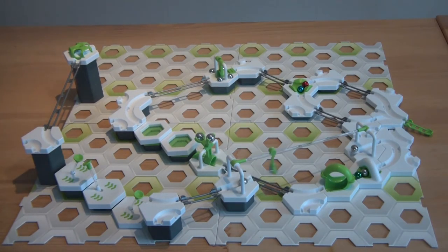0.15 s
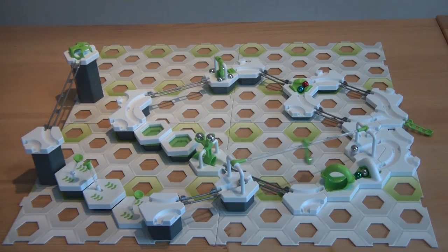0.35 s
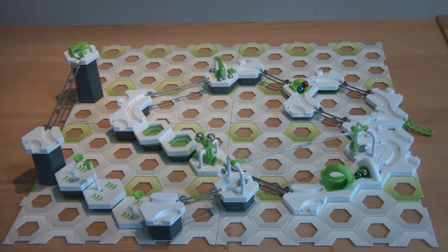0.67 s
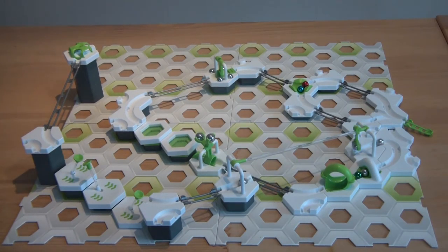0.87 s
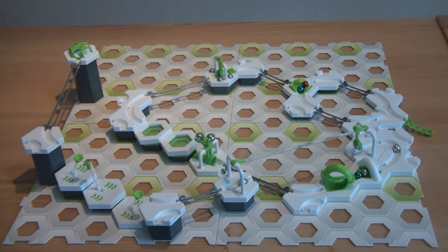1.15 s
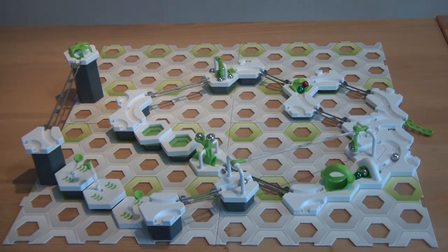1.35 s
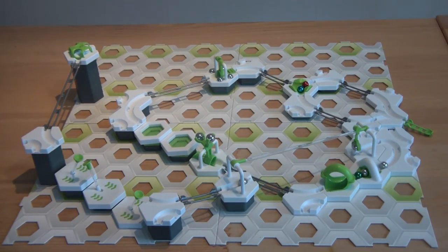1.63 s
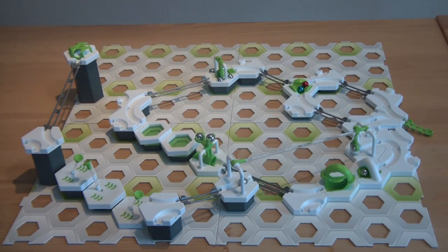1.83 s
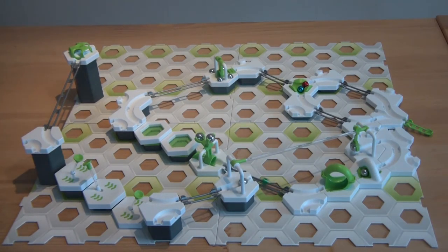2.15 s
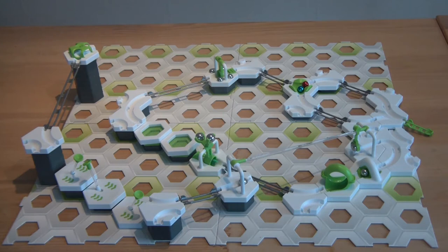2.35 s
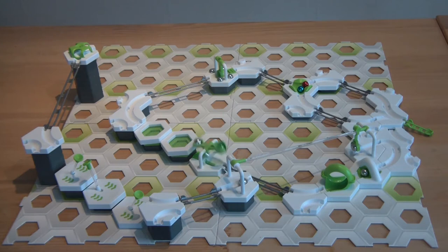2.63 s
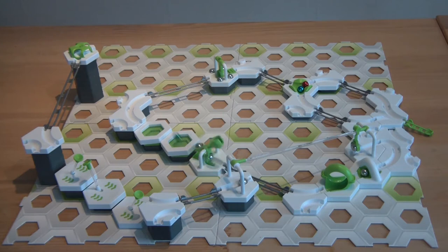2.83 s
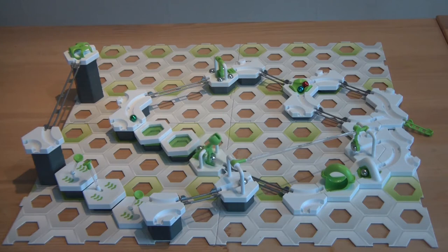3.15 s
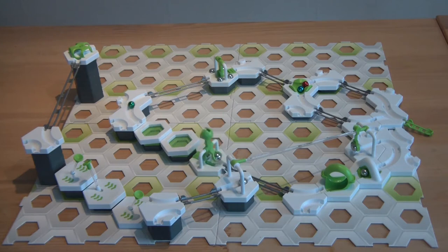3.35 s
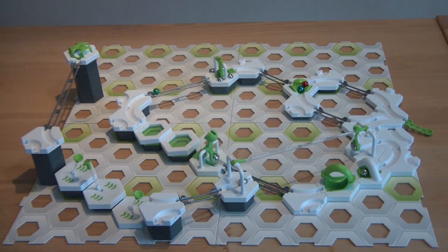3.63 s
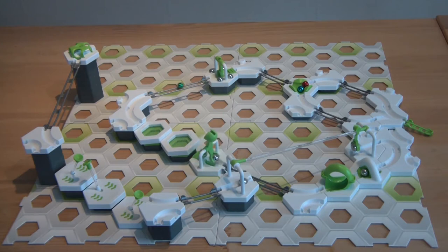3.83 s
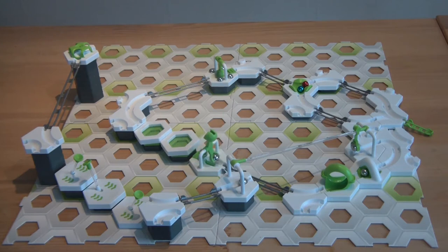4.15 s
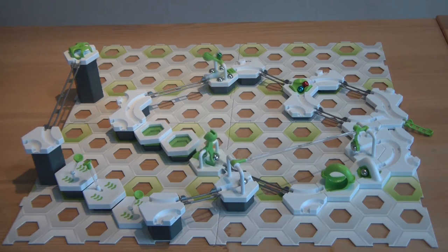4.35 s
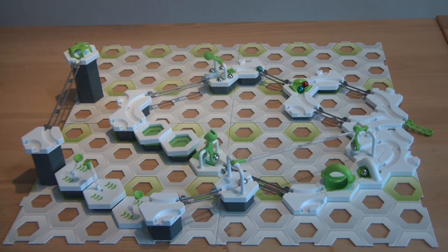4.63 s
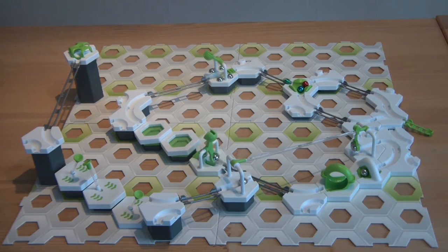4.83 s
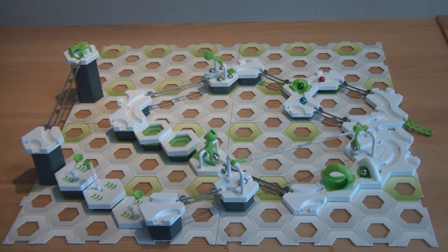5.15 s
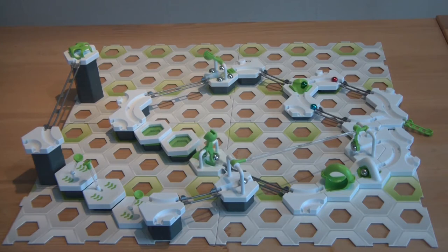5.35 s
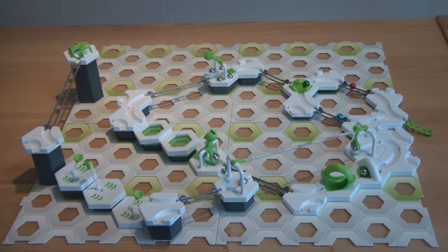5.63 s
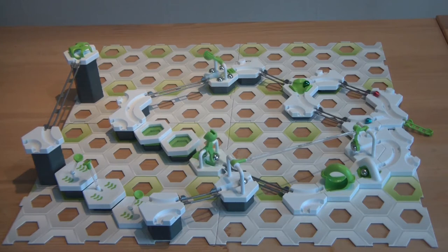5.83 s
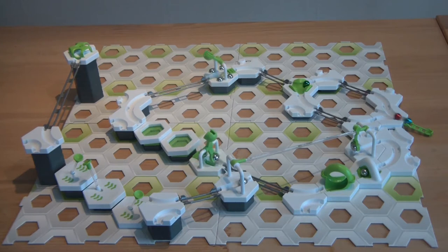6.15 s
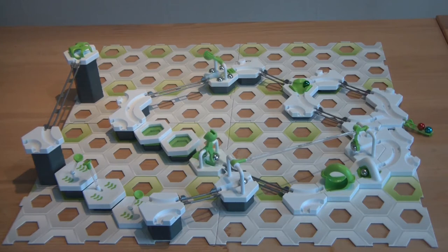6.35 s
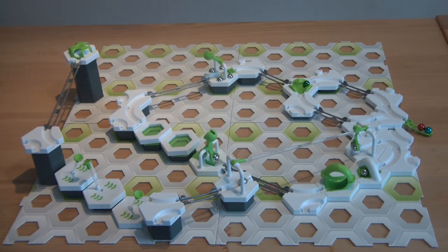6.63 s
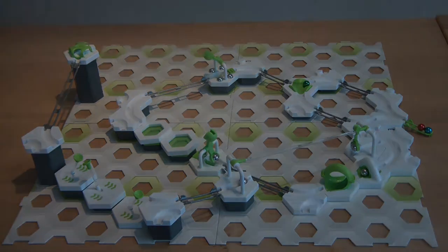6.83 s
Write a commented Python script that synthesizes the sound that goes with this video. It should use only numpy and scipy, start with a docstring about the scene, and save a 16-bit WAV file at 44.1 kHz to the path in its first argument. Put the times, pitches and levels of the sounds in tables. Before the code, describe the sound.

A bare room with steady low mains hum, soft hiss and a barely audible high whine. A short marble rattle meets quick plastic clacks at 0.1-0.2 s, then fading rolling. Firm clacks come at 0.8 s and softer taps at 1.05-1.3 s, over a hollow rumble with a rising low singing tone. At 1.92 s a bright double snap leads to harsh rail rattle, a ringing slide and scattered knocks through 2.57 s. After quieter rolling, a strong, ringing clack lands at 3.13 s, another at 3.24 s, then a rumbling, singing roll fades. Light ticks at 4.1-4.3 s precede the loudest, overloaded clacks at 4.5-4.7 s and a cluster at 5.0-5.1 s. Rolling resumes, fading, with small ticks from 5.6 s; a rougher roll swells from 6.0 s into rapid tray clacks at 6.3-6.54 s. The room tail dies and everything fades.

```python
"""Steel marbles run through a toy course of plastic tiles and metal rails on a table in a bare room.
They rumble, rattle and sing along the track, made from streams of tiny bumps. One by one they strike a flipper,
curve, cannon, rails, hammer, tile, magnet, lever, store and tray: each blow is a short push that rings the piece,
and a harder contact makes a brighter clack. The room answers with a long tail, over steady mains hum, hiss and
a faint whine made from sine waves and noise. At the end everything fades."""
import sys
import numpy as np
from scipy import signal
from scipy.fft import irfft
from scipy.io import wavfile

SR = 44100
rng = np.random.default_rng(int(sys.argv[2]) if len(sys.argv) > 2 else 0)


def unload_wav(signal):
    """Save mono or channel-first audio to the path in sys.argv[1] as 16-bit WAV at rate SR, clipped to [-1, 1]."""
    wavfile.write(
        sys.argv[1],
        SR,
        np.round(np.clip(np.atleast_2d(signal).T, -1, 1) * 32767).astype(np.int16),
    )


N = 307818
TIME = np.arange(N) / SR  # in s

# Levels in the tables are relative: later steps of the mix scale them.
# Every blow: [t/s, strength level/dB, hardness as treble tilt/dB per octave]
BLOWS = [ (0.0832, 8, 2.1), (.169, 19.5, 0.74), (0.2197, 17, -2.5), (0.531, -20, -2), (0.7698, 16, -0.7),
         (0.8215, 9.5, 3), (.827, 22.5, -4.5), (1.047, 14, -9), (1.082, 12.5, -13.5), (1.3195, 6.5, -9.5),
         (1.786, -3, -9), (1.917, 4, 10), (1.92, 11, 8.5), (1.9297, 18.5, 1.5), (1.953, 19.5, 3),
         (2.089, 8.5, 0.5), (2.1623, 13.5, -7), (2.2476, 16.5, -4.5), (2.2927, 11, 1), (2.445, 9, -0.5),
         (2.477, 10.5, 0.5), (2.5454, 21.5, 1.2), (2.571, 12.5, 1), (2.873, 5.5, -1), (3.1253, 9, 0.5),
         (3.1324, 25, -1), (3.238, 19, 2), (3.244, 20.5, -6), (3.4932, 5.5, -8), (3.734, -4, -1.5),
         (3.8275, -9.5, -3), (4.1387, 4.5, -2.5), (4.2097, 6.5, -4.5), (4.2719, 2, -2.5), (4.3107, 17, 1.5),
         (4.329, 13, 1), (4.525, 29, -1.8), (4.6275, 32, 2), (4.641, 25, -0.5), (4.679, 22, -0.5),
         (4.824, 12, 2), (4.9575, 2.5, 2), (5.013, 20, -2.5), (5.053, 18.5, -1), (5.073, 15, 2),
         (5.088, 22, -4.5), (5.563, -2, -1), (5.6445, 5, 0), (5.7842, 3, -0.5), (5.863, 5, 1),
         (5.96, 7, -1.5), (6.058, 6.5, -2), (6.158, 10, -10), (6.2665, 8, -3), (6.313, 15.5, -0.3),
         (6.372, 13.5, -0.5), (6.411, -6, 8.5), (6.462, 17.5, 0.5), (6.488, 20, -11), (6.507, 10, 6.5),
         (6.538, 17, 1), ]
# The pieces in the order they are reached: flipper, flipper falling back, landing in the curve, curve wall,
# cannon, rails, hammer, landing on the tile, magnet, long rails, lever, lever falling, marble store,
# store opening, last rails, tray.
# [from t/s, direct sound level/dB, thud of the board level/dB, ring level/dB, modes [f/Hz, width f/Hz, level/dB]]
PIECES = [ (0, 2.5, -1, 4.2, [(647, 110, -1.5), (1206, 100, -4), (440, 60, -18), (3750, 230, -6),
          (4400, 410, -6.5)]), (0.5, -3, -13, 27.7, [(3950, 400, 3)]),
          (0.7, 1, -3, 20.2, [(1053, 127, -6.5), (1220, 114, -6), (560, 150, -15), (3170, 890, -21.5)]),
          (1.0, 4.5, -6, 10.7, [(1440, 160, -12), (3100, 140, 0.5)]), (1.8, 3, -3, 14.6, [(2058, 28, 6),
          (1920, 230, -5), (4620, 92, -5), (13600, 1850, -10)]), (2.15, -3.5, -10, 9.1, [(694, 25, 5.5),
          (1410, 210, -4), (1590, 32, -10), (6300, 3000, -7)]), (2.5, -3, -2, 5.9, [(98.4, 42, 0.5),
          (2240, 150, -5), (3900, 100, -1), (6870, 210, -1)]), (3.0, 2.5, 2.5, 6.3, [(793, 14, 7),
          (1820, 53, -1), (2350, 64, -7), (6430, 98, 0)]), (3.2, 3, 2.5, 24.5, [(240, 75, -16.5),
          (407.4, 12, -11), (2070, 35, 1.5), (2870, 34, -13), (1765, 95, -9), (4830, 60, -10)]),
          (3.45, 3.5, 2, 14.7, [(1800, 210, -9), (3060, 62, -9), (5420, 450, 0.5)]),
          (4.0, -5.5, 0, 4, [(666, 14, 5.5), (1720, 120, -6), (3900, 150, -3.5), (5670, 1540, 1.5),
          (8000, 1330, -16)]), (4.5, 3, 3, 1.6, [(125, 37, -5.5), (899, 130, 3), (1690, 110, -8),
          (3770, 170, -7.5)]), (4.61, 3, -4.5, 8.6, [(406, 16, -0.5), (1490, 92, -6), (1910, 400, -12.5),
          (3470, 370, -6.5), (4800, 98, -16.5)]), (4.95, 0, 0.5, 1.3, [(114, 90, 2.5), (736, 110, -1.5),
          (1730, 17, -2), (5010, 110, 4)]), (5.5, -2.5, -5.5, 2.2, [(1760, 240, 3), (5020, 340, 0),
          (7430, 1300, -20)]), (6.3, -4.5, -1.5, 12.2, [(117, 51, -2), (1734, 240, -6), (6340, 57, -10)]), ]
# Steel on plastic at ordinary hardness: [f/Hz, level/dB]
CONTACT_SPECTRUM = [(1400, -1), (4200, -5), (10500, -19)]
# Stretches that a marble rolls:
# [start t/s, end t/s, rumble of the tiles level/dB, rattle in the groove level/dB, level change/dB per s]
RUNS = [ (0, .16, -30, -12.5, -37), (0.142, .75, -27, -48, -24.5), (0.826, 1.9, -26, -52, -10.5),
        (1.981, 2.154, -32, -12, -18), (2.536, 3.1, -34.5, -33, -28), (3.26, 3.8, -19.5, -26, -22),
        (3.792, 4.5, -43, -41, 7.5), (5.06, 5.85, -23.5, -43, -15.5), (5.838, 6.05, -25.5, -22.5, -11),
        (6.035, 6.485, -21, -32, 8), ]
# Tone of the hollow tiles under a rolling marble: [f/Hz, level/dB]
RUMBLE_SPECTRUM = [(60, -11), (120, -5.5), (200, 2), (350, 0), (700, -2), (1200, -7), (3000, -19),
                   (16000, -64.5)]
# Tone of a marble rattling in the groove: [f/Hz, level/dB]
RATTLE_SPECTRUM = [(100, -21), (500, -6), (900, -10.5), (1400, -6.5), (1850, -5), (2400, -12), (3200, -12),
                   (5000, -17.5), (8000, -24.5), (16000, -45)]
# Stretches that sing under a rolling ball; each filter pass doubles the width:
# [start t/s, end t/s, first f/Hz, last f/Hz, width f/Hz, level/dB]
SINGS = [ (1.2, 1.645, 362, 513, 53.7, -23), (1.326, 1.955, 1260, 1430, 120, -38),
         (1.492, 1.897, 2450, 2440, 100, -42), (2.045, 2.153, 2920, 2180, 300, -12),
         (2.154, 2.3, 1585, 1344, 70, -6.5), (2.45, 2.543, 1340, 1490, 140, -17),
         (3.387, 3.64, 1750, 1680, 130, -16.5), (3.406, 3.784, 527, 684, 187, -20.5),
         (4.19, 4.308, 1805, 1107, 200, -24.5), (5.094, 5.703, 400, 313, 69.7, -19),
         (5.2, 5.554, 750, 567, 109, -27), (6.066, 6.47, 500, 705, 480, -23),
         (5.846, 6.396, 1800, 1660, 271, -23), ]
# How well the board gives off sound: [f/Hz, level/dB]
BOARD_SPECTRUM = [(30, -27), (105, -14.5), (133, -1), (160, -8), (250, -4), (400, -1.5), (500, -4),
                  (1000, -0.5), (1500, 0.5), (2300, -0.5), (3200, 0.5), (4000, 1.5), (7000, 0.5), (9000, 0),
                  (12200, 1.5), (15500, -15.5)]
# Time in which the room's tail drops by 60 dB: [f/Hz, t/s]
ROOM_DECAY = [(150, 0.58), (400, 0.75), (1000, 0.62), (2800, 0.61), (7000, 0.49), (14000, 0.24)]
# Gain of the side (left-right difference) for marbles and room: [f/Hz, level/dB]
STEREO_WIDTH = [(100, -21.5), (300, -34.5), (700, -18), (1400, -17.5), (2200, -15), (2800, -13), (5500, -6),
                (10000, -1), (15000, -4)]
# Sine waves of the mains hum: [f/Hz, rms level/dB]
HUM_TONES = [(25, -57), (50, -38), (150, -53.5), (250, -64)]
# Hiss common to left and right: [f/Hz, level/dB]
HISS_MID = [(20, -25), (60, -33.5), (120, -35.5), (400, -48), (1400, -47.5), (4000, -55), (10000, -55.5),
            (16000, -55.5)]
# Hiss that differs between left and right: [f/Hz, level/dB]
HISS_SIDE = [(20, -32), (60, -41.5), (120, -48.5), (300, -48), (700, -52), (2200, -79), (4500, -54.5),
             (10000, -58), (12500, -54), (14500, -62)]
# Overall level, falling at the end: [t/s, level/dB]
FADE = [(6.55, -0.5), (6.75, -3.5), (6.98, -8)]

BEND_HZ = 408  # above this, bending waves in the board speed up with frequency
RUN_ATTACK_S, RUN_RELEASE_S = 0.023, 0.089
SCATTER_S = 0.015  # decay time of the scatter off the table
HUM_SIDE_DB = -21  # against the hum in the mid
WHINE_HZ, WHINE_DB, WHINE_SIDE_DB = 12187, -79.5, -77
EDGE_HZ = 15500  # upper limit of the sound


def blows(level_db=-1.86):
    """Every blow comes from another spot on the board, so it has its own path through the room."""
    out = np.zeros((2, N))
    for start, strength_db, hardness_db in BLOWS:
        piece_number = sum(piece[0] <= start for piece in PIECES[1:])
        _, direct_db, thud_db, ring_db, modes = PIECES[piece_number]
        sound = clack(strength_db, hardness_db, thud_db, ring_db, modes)
        in_room = signal.fftconvolve(sound[None], room(direct_db), axes=1)
        add(out, start, in_room)
    return amp(level_db) * out


def clack(strength_db, hardness_db, thud_db, ring_db, modes, shell=0.69, shell_s=0.009, bend_s=0.001264, size=8192):
    """A hard contact shakes the thin plastic shell for a moment and rings the piece that is struck."""
    shake = rng.standard_normal(size) * np.exp(-np.arange(size) / SR / shell_s)
    shake /= np.linalg.norm(shake)
    # Bending waves: treble arrives first, so the click is smeared in time.
    delay = bend_s / np.sqrt(1 + np.fft.rfftfreq(size, 1 / SR) / BEND_HZ)
    phase = -2 * np.pi * np.cumsum(delay) * SR / size
    click = irfft(np.exp(1j * phase))
    push = click + shell * shake
    push /= np.linalg.norm(push)
    push = amp(strength_db) * colour(push, contact(hardness_db, thud_db))
    ring = sum(amp(ring_db + db) * resonate(push, hz, width) for hz, width, db in modes)
    return push + ring


def contact(hardness_db, thud_db, thud_hz=400):
    """Spectrum of a blow: the piece sets the bass, and a harder, shorter contact tilts the treble up."""
    knee_hz = CONTACT_SPECTRUM[0][0]
    treble = [(hz, db + hardness_db * np.log2(hz / knee_hz)) for hz, db in CONTACT_SPECTRUM]
    return [(thud_hz, thud_db)] + treble


def rolling():
    """Dense bumps rumble in the hollow tiles; sparser, less uneven ones rattle in the groove."""
    on_tiles, in_groove = np.zeros((2, N))
    for start, end, rumble_db, rattle_db, db_per_s in RUNS:
        loudness = pace(start, end, db_per_s)
        on_tiles += amp(rumble_db) * loudness
        in_groove += amp(rattle_db) * loudness
    rumble = colour(bumps(per_s=4000, spread_db=2.0) * on_tiles, RUMBLE_SPECTRUM)
    rattle = colour(bumps(per_s=220, spread_db=1.5) * in_groove, RATTLE_SPECTRUM)
    track = rumble + rattle + singing()
    return signal.fftconvolve(track[None], room(), axes=1)[:, :N]


def pace(start, end, db_per_s):
    """Loudness of one run: the marble gets going, slows or speeds up evenly, and leaves the stretch."""
    rise = np.clip((TIME - start) / RUN_ATTACK_S, 0, 1)
    change = amp(db_per_s * (np.clip(TIME, start, end) - start))
    release = np.exp(-np.maximum(TIME - end, 0) / RUN_RELEASE_S)
    return rise * change * release


def bumps(per_s, spread_db):
    """Tiny contacts of a ball with the grain of the track, of uneven size."""
    size = amp(spread_db * np.minimum(rng.exponential(1, N), 4))
    direction = rng.choice([-1, 1], N)
    hit = rng.random(N) < per_s / SR
    train = size * direction * hit
    return train / np.std(train)


def singing():
    """Bumps feed a resonance of the track that swells and shifts as the ball passes."""
    out = np.zeros((1, N))
    drive = bumps(per_s=1200, spread_db=-2.5)
    for start, end, first_hz, last_hz, width, db in SINGS:
        part = drive[round(start * SR):round(end * SR)]
        hz = np.linspace(first_hz, last_hz, len(part))
        tone = resonate(resonate(part, hz, 2 * width), hz, 2 * width)  # twice: steep flanks
        swell = signal.windows.tukey(len(part), 0.8)
        add(out, start, amp(db) * (tone * swell)[None])
    return out[0]


def room(direct_db=0, wall=0.17, wall_s=0.0058, early=0.33, late=0.78, build_s=0.0025):
    """Mid and side response: the direct sound, a near wall, scatter off the table, and a diffuse tail."""
    t = np.arange(SR) / SR
    # Random echoes: one sample in ten for the tail, three in a hundred for the scatter.
    echoes = rng.standard_normal((2, 2, SR))
    present = rng.random((2, 2, SR)) < np.reshape([0.1, 0.03], (2, 1, 1))
    taps, scatter = echoes * present
    # Cut the tail into bands, so that each pitch range dies away at its own speed.
    hz, at, bands = signal.stft(taps, SR, nperseg=256)
    t60 = read(ROOM_DECAY, hz)[:, None]
    bands = bands * amp(-60 * at / t60) / np.sqrt(t60)
    tail = signal.istft(bands, SR, nperseg=256)[1][:, :SR]
    tail *= 1 - np.exp(-t / build_s)
    scatter *= np.exp(-t / SCATTER_S)
    out = late * tail / np.linalg.norm(tail[0]) + early * scatter / np.linalg.norm(scatter[0])
    out[0, 0] += 0.4 * amp(direct_db)  # direct sound, in the mid only
    out[:, round(wall_s * SR)] += wall
    return out


def background():
    """Mains hum, a faint electrical whine and a soft, even hiss, as mid and side."""
    hum = np.zeros(N)
    for hz, db in HUM_TONES:
        hum += amp(db) * np.sqrt(2) * np.sin(2 * np.pi * (hz * TIME + rng.random()))
    whine = np.sqrt(2) * np.exp(2j * np.pi * WHINE_HZ * TIME)
    mid = colour(rng.standard_normal(N), HISS_MID) + hum + amp(WHINE_DB) * whine.real
    side = colour(rng.standard_normal(N), HISS_SIDE) - amp(HUM_SIDE_DB) * hum + amp(WHINE_SIDE_DB) * whine.imag
    return np.array([mid, side])


def amp(db):
    """Turns decibels into a gain."""
    return 10 ** (np.asarray(db) / 20)


def read(points, hz):
    """Reads a curve's value at hz, on a log-frequency axis."""
    f, value = np.transpose(points)
    return np.interp(np.log(hz + 1), np.log(f + 1), value)


def colour(x, points, size=4096):
    """Filters with the given spectrum, without sounding ahead of its input (minimum phase)."""
    log_gain = np.log(amp(read(points, abs(np.fft.fftfreq(size, 1 / SR)))))
    taps = np.fft.ifft(np.exp(np.conj(signal.hilbert(log_gain)))).real
    return signal.oaconvolve(x, taps[:size // 2])[:len(x)]


def resonate(x, hz, width):
    """A ringing mode that dies away, of gain 1 at its peak; hz may be a curve."""
    turn = np.exp(2j * np.pi * np.cumsum(hz * np.ones(len(x))) / SR)
    r = np.exp(-np.pi * width / SR)  # a wider mode dies sooner
    # Shift the mode down to 0 Hz, smooth it there, and shift it back.
    smooth = signal.lfilter([1 - r], [1, -r], x / turn)
    return 2 * (turn * smooth).real


def add(mix, start, sound):
    """Mixes a sound in at a start time in s, cut off where the mix ends."""
    part = mix[:, max(round(start * SR), 0):][:, :sound.shape[1]]
    part += sound[:, :part.shape[1]]


def scene():
    """The board colours the marbles' sound; their bass is nearly mono, and the treble spreads wide."""
    mid, side = (colour(part, BOARD_SPECTRUM) for part in blows() + rolling())
    mid, side = np.array([mid, colour(side, STEREO_WIDTH)]) + background()
    return np.array([mid + side, mid - side])  # left, right


def record(dry):
    """The hardest blows overload the microphone; then come the fade and the band limit."""
    overloaded = np.clip(dry, -1, 1)
    faded = overloaded * amp(np.interp(TIME, *np.transpose(FADE)))
    low_pass = signal.firwin(255, EDGE_HZ, window=("kaiser", 9), fs=SR)
    return signal.oaconvolve(faded, low_pass[None], "same")


dry = scene()
out = record(dry)
unload_wav(out)
```